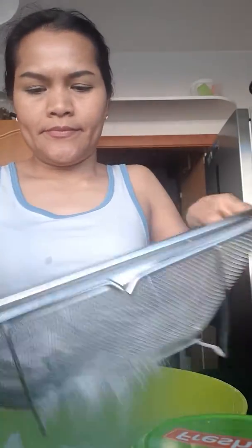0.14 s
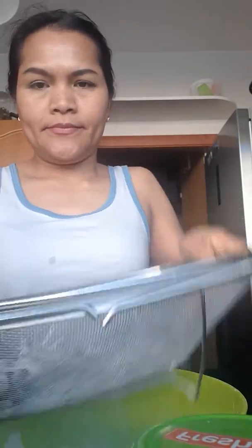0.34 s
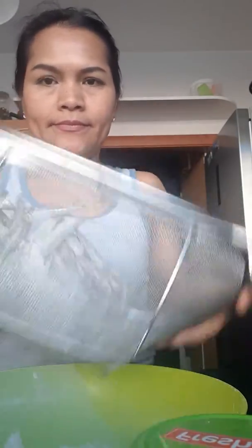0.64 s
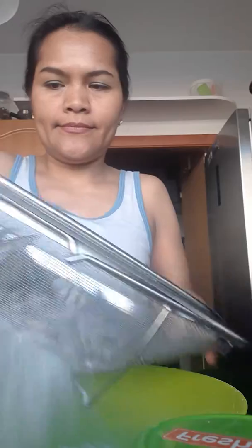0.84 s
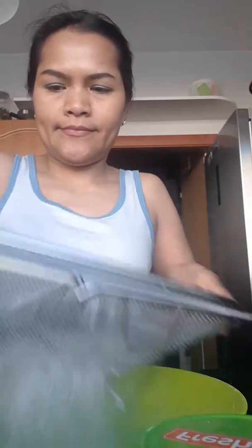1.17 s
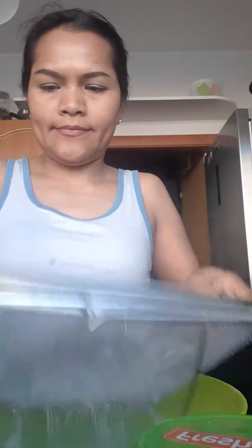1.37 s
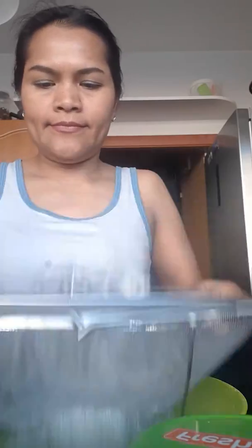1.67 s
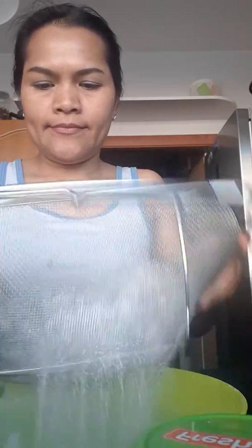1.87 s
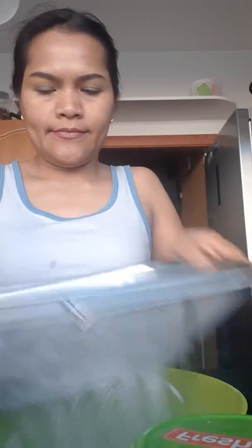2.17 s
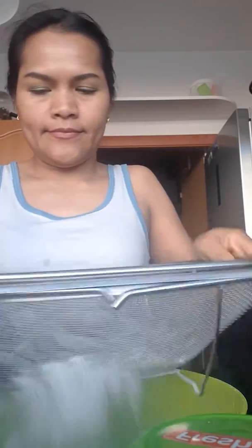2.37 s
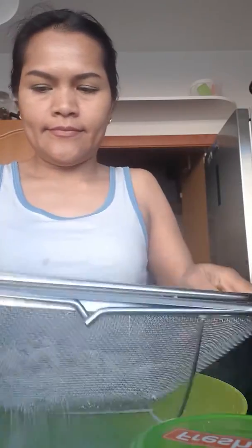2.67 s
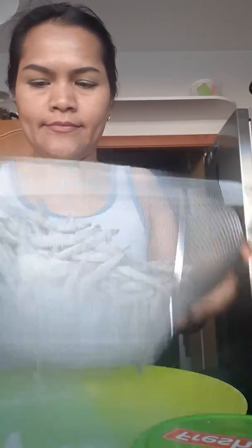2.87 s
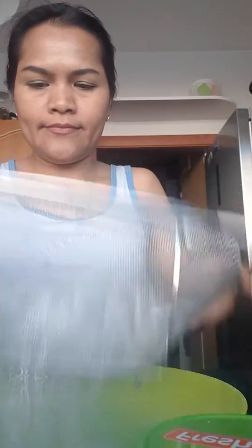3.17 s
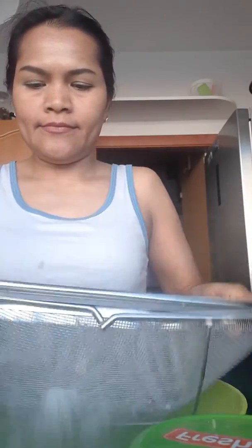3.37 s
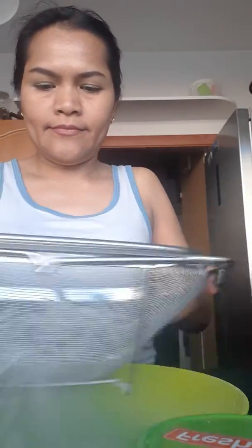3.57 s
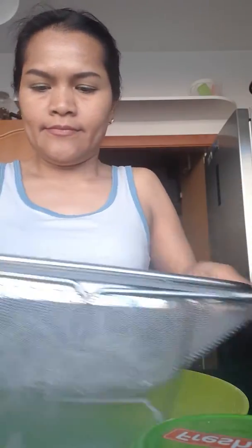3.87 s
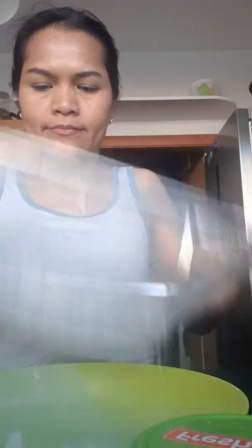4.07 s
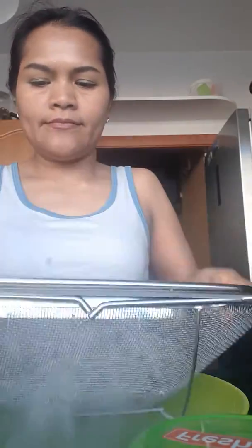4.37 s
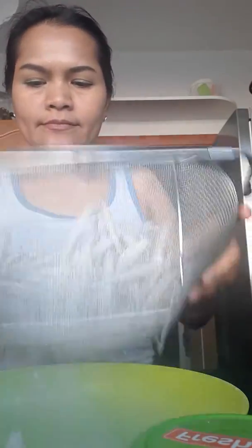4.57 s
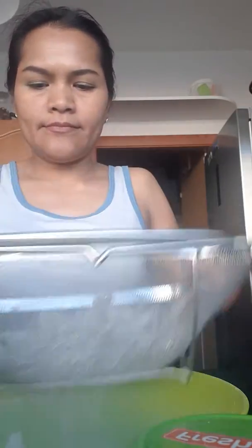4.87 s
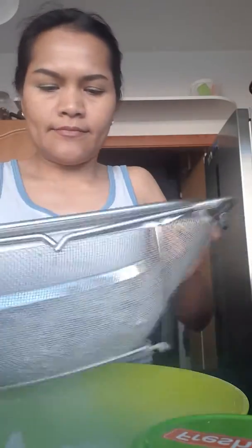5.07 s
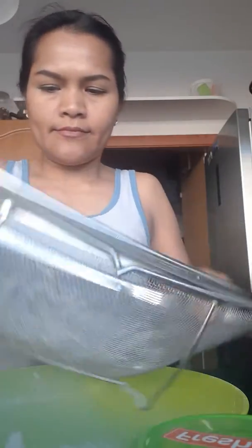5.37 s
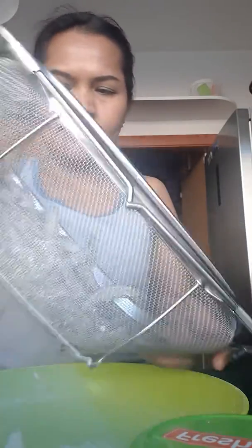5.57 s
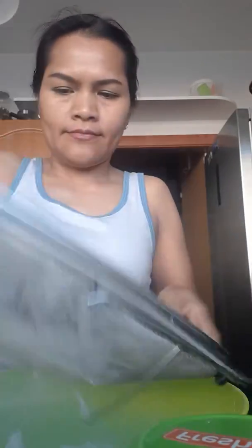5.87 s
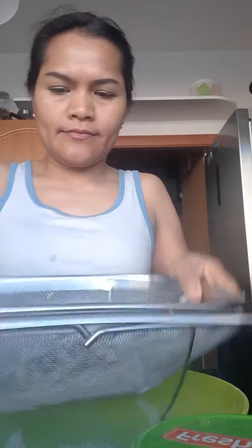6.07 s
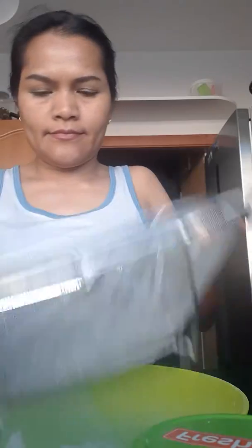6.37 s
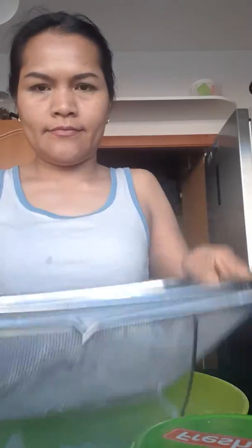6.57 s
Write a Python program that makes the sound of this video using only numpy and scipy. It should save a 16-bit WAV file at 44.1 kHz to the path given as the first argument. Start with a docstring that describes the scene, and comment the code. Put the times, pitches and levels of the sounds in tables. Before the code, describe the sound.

Close to the microphone in a kitchen, a wire strainer is shaken continuously, its load of floured fish skidding and dropping on the mesh with a raspy rustle and a fine hiss of flour. Light metal ticks grow into a run of sharp clicks midway, joined by a hollow knock on a plastic bowl, then thin out as the swishing continues. An appliance hums quietly behind.

```python
"""Tossing floured fish in a strainer

Small floured fish are tossed in a steel mesh strainer over a plastic bowl, close to a phone in a kitchen.
Each lurch sends the load skidding over the wires with a buzz; it drops back on the mesh and sheds flour.
The loose wire legs tick on the rim, and a leg knocks the bowl. An appliance drones behind.
The right microphone port faces the strainer; the phone's body shades the left."""
import sys
import numpy as np
from scipy import signal
from scipy.fft import rfft, irfft, next_fast_len
from scipy.io import wavfile
from scipy.ndimage import uniform_filter1d, map_coordinates

SR = 44100
rng = np.random.default_rng(int(sys.argv[2]) if len(sys.argv) > 2 else 0)


def unload_wav(signal):
    """Save mono or channel-first audio to the path in sys.argv[1] as 16-bit WAV at rate SR, clipped to [-1, 1]."""
    wavfile.write(
        sys.argv[1],
        SR,
        np.round(np.clip(np.atleast_2d(signal).T, -1, 1) * 32767).astype(np.int16),
    )


N = 296164

# skids of the load: (time [s], level [dB], crossing rate [Hz], fizz [dB], width [octaves], T60 [s])
SKIDS = [(0.0, -48, 2213, -7, 0.184, 0.4842), (0.04, -43, 3295, -6.5, 0.228, 0.3264),
         (0.073, -39, 3336, -8.5, 0.2697, 0.3107), (0.104, -43, 2165, -30, 0.273, 0.3232),
         (0.154, -41.5, 3450, -22.5, 0.261, 0.2988), (0.224, -40.5, 3966, -15.5, 0.33, 0.2663),
         (0.243, -43, 3060, -19.5, 0.2754, 0.3149), (0.374, -49, 2954, -32.5, 0.273, 0.2306),
         (0.439, -54, 3400, -6.5, 0.2913, 0.5), (0.5, -54, 2295, -1.5, 0.2343, 0.8385),
         (0.572, -47, 3200, -21, 0.262, 0.5895), (0.601, -33.5, 2072, -41, 0.2186, 0.3832),
         (0.62, -47, 2868, -31, 0.1388, 0.2796), (0.655, -46.5, 2988, -10, 0.3806, 0.5153),
         (0.672, -43.5, 3578, -7, 0.3056, 0.382), (0.773, -44.5, 3479, -5, 0.2558, 0.3223),
         (0.775, -46, 4755, -20, 0.1176, 0.1111), (0.886, -44, 2150, -37, 0.193, 0.6079),
         (0.953, -39.5, 3515, -12, 0.1715, 0.393), (1.083, -47.5, 2407, -4.5, 0.496, 0.5531),
         (1.331, -46.5, 4535, -3.5, 0.3903, 0.1557), (1.335, -54.5, 8497, -30, 0.0715, 0.0066),
         (1.357, -43.5, 3492, -25.5, 0.1977, 0.536), (1.383, -39, 2013, -33, 0.189, 0.3265),
         (1.443, -37, 2802, -17.5, 0.371, 0.3649), (1.484, -53.5, 8238, -12, 0.1054, 0.1572),
         (1.576, -54, 3719, -30, 0.2456, 0.5), (1.643, -45.5, 2446, -7.5, 0.2397, 0.5371),
         (1.673, -43, 2746, -18.5, 0.2765, 0.5012), (1.754, -42, 2112, -2.5, 0.2602, 0.2924),
         (1.824, -36.5, 3176, -9, 0.2135, 0.2363), (1.886, -46.5, 4995, -4, 0.262, 0.2029),
         (1.89, -57.5, 8284, -27.5, 0.072, .5), (1.922, -52, 8506, -30, 0.0613, 0.2913),
         (1.925, -42.5, 4383, -9, 0.278, 0.29), (1.98, -41, 3802, -4, 0.357, 0.4034),
         (2.03, -45.5, 2249, -16, 0.2875, 0.0591), (2.087, -46, 3178, -11, 0.1635, 0.6475),
         (2.184, -41, 2128, -28.5, 0.1888, 0.5177), (2.312, -42.5, 2262, -5.5, 0.2395, 0.6202),
         (2.366, -49.5, 3825, -11, 0.2424, 0.5634), (2.405, -44, 2721, -29, 0.3664, 0.37),
         (2.459, -49.5, 5239, -1, 0.2382, 0.5339), (2.601, -48, 3520, -12, 0.404, 0.3281),
         (2.644, -44, 3021, -21.5, 0.2718, 0.2717), (2.713, -44.5, 2806, -10.5, 0.4082, 0.3797),
         (2.894, -45.5, 4295, -12, 0.2832, 0.4824), (2.956, -38.5, 2406, -4.5, 0.5116, 0.4491),
         (3.013, -35.5, 2660, -32.5, 0.2483, 0.3125), (3.084, -46.5, 5529, -21.5, 0.235, 0.268),
         (3.139, -46, 3003, -34.5, 0.3484, 0.4152), (3.248, -47.5, 3016, -4, 0.295, 0.4427),
         (3.33, -43.5, 2159, -3, 0.2956, 0.6063), (3.419, -41, 2211, -4, 0.8, 0.6618),
         (3.554, -45, 2937, -6, 0.3853, 0.5), (3.645, -40, 4513, -25.5, 0.266, 0.2434),
         (3.77, -40, 2401, -25.5, 0.1857, 0.1065), (3.891, -45.5, 5268, -4.5, 0.1679, 0.6008),
         (3.936, -42.5, 3379, -31, 0.339, 0.41), (4.013, -42, 3756, -31, 0.193, 0.3543),
         (4.11, -46, 4704, -3.5, 0.3225, 0.3176), (4.181, -45.5, 4175, -2.5, 0.1702, 0.2784),
         (4.268, -37.5, 2123, -2.5, 0.1385, 0.2675), (4.305, -38.5, 2362, -28, 0.2687, 0.2294),
         (4.343, -37.5, 3384, -3, 0.2803, 0.3187), (4.446, -55.5, 3682, -1.5, 0.2406, 0.6747),
         (4.578, -48.5, 5324, -8, 0.3015, 0.5384), (4.617, -49, 2496, -27, 0.2446, 0.6126),
         (4.66, -43.5, 3734, -11.5, 0.2792, 0.5241), (4.734, -42, 3775, -10.5, 0.432, 0.2065),
         (4.742, -36.5, 2094, -20, 0.1586, 0.3449), (4.828, -52.5, 4085, -24, 0.295, 0.258),
         (4.889, -60, 7661, -12, 0.2467, 0.9262), (4.917, -49, 3822, -33, 0.284, 0.5),
         (5.011, -51, 3045, -18.5, 0.2308, 0.29), (5.116, -45, 3124, -9.5, 0.2702, .5),
         (5.189, -49.5, 2527, -2.5, 0.4493, 0.5), (5.299, -46, 3291, -19.5, 0.0876, 0.3535),
         (5.364, -34.5, 1912, -30, 0.3483, 0.3069), (5.495, -43, 2462, -4.5, 0.2675, .5),
         (5.55, -41.5, 4107, -14, 0.2956, 0.4288), (5.636, -43, 2396, -7, 0.2456, 0.7033),
         (5.712, -43, 2074, -12, 0.3893, .5), (5.834, -42.5, 2347, -39, 0.1944, 0.1926),
         (5.861, -41.5, 3054, -20.5, 0.4098, 0.488), (5.956, -39, 3056, -6.5, 0.238, 0.3039),
         (5.984, -38, 1968, -28.5, 0.2442, 0.0422), (6.087, -59, 7528, -4, 0.192, 0.8566),
         (6.208, -55, 5707, -27.5, 0.2467, 1), (6.295, -54.5, 3813, -4.5, 0.261, 0.7221),
         (6.371, -48, 2519, -29.5, 0.1823, 0.5836), (6.427, -38, 4350, -4, 0.2586, 0.1858),
         (6.473, -39.5, 2777, -31, 0.3576, 0.1511), (6.573, -48, 5168, -25, 0.3223, 0.3847),
         (6.618, -42.5, 3327, -36, 0.2433, 0.312), (6.691, -52, 2289, 0, 0.171, 2)]
# spectrum of the hiss on the mesh: (frequency [Hz], level [dB])
MESH_HISS = [(2500, -22.5), (4500, -2), (6500, -7), (8400, -7), (9300, -14.5), (12000, -18.5), (14000, -26),
             (15800, -33.5)]


def skids():
    """Periodic excitation: fish crossing evenly spaced wires buzz at speed / spacing, with fizz above."""
    low_edge = 0.9048  # the band is narrower below its pitch: no fish slides slowly
    out, t = np.zeros((2, N)), np.arange(SR // 2) / SR
    for s, db, hz, fizz_db, width, t60 in SKIDS:
        lag = rng.integers(-16, 17)
        offset = lambda f: np.abs(np.log2((f + 1) / hz)) / (width * np.where(f < hz, low_edge, 1))
        faster = amp(-10 + 0.17166 * fizz_db)  # a fizzy lurch has more fast fish
        shoulder = lambda f: faster / (1 + (0.659 * hz / (f + 1)) ** 9) / (1 + (f / 5500) ** 4)
        buzz = port_noise(lambda f: np.exp(-offset(f) ** 1.382) + shoulder(f), len(t), lag, 0.7223)
        fizz = amp(fizz_db) * rise(t, 0.0092) * port_noise(spectrum(MESH_HISS), len(t), lag, grain_db=1)
        landing = 1 + 1.872 * decay(t, 0.010616)  # the first fish hit hardest
        stroke = rise(t, 0.002635) * decay(t, t60)
        lumps = amp(wobble(50, len(t)) + 1.3 * wobble(170, len(t)))  # fish after fish
        add(out, s, amp(db) * stroke * lumps * (landing * buzz + fizz))
    return out


def leg_ticks():
    """Impact of steel on steel: a crack and damped modes, coloured by the blow's spot and sharpness."""
    # legs on the rim: (time [s], level [dB], centre [Hz], fall [dB/octave], cutoff [Hz], T60 [s])
    taps = [(0.226, -43, 4295, 6, 8005, 0.01422), (0.6075, -35, 2099, 14, 6000, 0.01858),
            (0.6236, -39, 7490, 9, 9480, 0.0118), (0.8313, -43.5, 2651, 7, 4007, 0.01745),
            (0.9552, -38, 3400, 9.5, 7010, 0.01892), (1.332, -43.5, 4726, 5, 9000, 0.01757),
            (1.4446, -44, 2997, 5, 8000, 0.01496), (1.6222, -42.5, 2485, 7, 5000, 0.01767),
            (1.6735, -33.5, 2534, 7, 6010, 0.02216), (1.7701, -40.5, 4500, 2.5, 12000, 0.01366),
            (1.9796, -40.5, 4206, 8.5, 9000, 0.01517), (2.713, -34, 2900, 6.5, 7010, 0.01719),
            (2.8313, -36, 2469, 5, 4802, 0.02294), (2.8763, -24, 2936, 9, 9060, 0.01814),
            (2.8874, -14.5, 7208, 9, 14450, 0.013656), (2.8887, -19, 7203, 6.5, 13800, 0.014546),
            (2.9667, -30.5, 2332, 4, 4503, 0.0184), (2.982, -32.5, 2503, 6.5, 5000, 0.01607),
            (2.9908, -27, 2446, 6, 8477, 0.01821), (3.0668, -49, 2770, 6, 8990, 0.0158),
            (3.11, -35, 3415, 8, 8960, 0.01562), (3.251, -41.5, 2520, 4, 9020, 0.03566),
            (3.26, -36, 2522, 5.5, 11990, 0.01849), (3.3289, -30.5, 2197, 8.5, 9955, 0.01848),
            (3.3532, -33, 2656, 5.5, 7990, 0.01611), (3.4121, -19, 1906, 7, 13550, 0.02258),
            (3.6304, -34.5, 3600, 15.5, 4500, 0.01767), (3.6364, -11.5, 7705, 5, 14160, 0.016363),
            (3.638, -19.5, 4434, 12.5, 5995, 0.02017), (3.6484, -23.5, 3009, 6, 6000, 0.01799),
            (3.7046, -33.5, 2267, 15, 8000, 0.0265), (3.734, -35, 3903, 9, 5968, 0.01827),
            (3.744, -30, 4712, 1.5, 8995, 0.02567), (3.761, -25, 2576, 2, 12940, 0.024105),
            (3.7641, -29, 2551, 20, 5025, 0.02487), (3.923, -26.5, 4536, 7.5, 9823, 0.01993),
            (4.1106, -40.5, 4531, 14.5, 7486, 0.01968), (4.1428, -37.5, 4723, 7.5, 6004, 0.02378),
            (4.2213, -37.5, 2462, 15, 7000, 0.02934), (4.2568, -32, 3917, 12.5, 9490, 0.02653),
            (4.2613, -24, 3882, 6.5, 11700, 0.021006), (4.2936, -28.5, 2201, 12, 8510, 0.0194),
            (4.376, -25, 2490, 19, 5011, 0.02643), (4.3976, -27, 3747, 3.5, 5984, 0.01512),
            (4.415, -37.5, 2218, 14.5, 4000, 0.01695), (4.5403, -34, 2495, 6, 8859, 0.015893),
            (4.652, -29, 3755, 8, 11490, 0.02199), (5.2797, -39, 2677, 3.5, 7027, 0.01765),
            (5.3669, -35, 2200, 6, 7004, 0.01855), (5.551, -36, 4303, 9.5, 7000, 0.0191),
            (5.7129, -37, 2569, 8, 5010, 0.01778), (5.7504, -38.5, 2270, 10, 5000, 0.01671),
            (6.4288, -38, 4296, 6.5, 9000, 0.01624), (6.6186, -40.5, 3310, 12, 7000, 0.01657)]
    # modes of rim and legs: (frequency [Hz], level [dB])
    rim_modes = [(2100, 0), (2520, 12), (2850, -1.5), (3300, 7), (4120, 8.5), (4640, 3), (5500, 0.5),
                 (6900, 2), (7500, 10.5), (8400, 3), (9100, 4), (10200, 6), (11800, 5), (13800, 1.5)]
    out, t = np.zeros((2, N)), np.arange(SR // 8) / SR
    for s, db, spot_hz, fall_db, top_hz, t60 in taps:
        left_db = 1.2483 + 3 * rng.standard_normal()
        tilt = lambda f: (-fall_db * np.abs(np.log2((f + 1) / spot_hz))
                          - 10 * np.log10(1 + (f / top_hz) ** 12))
        modes = [(hz, level, t60 * (spot_hz / hz) ** 0.5863) for hz, level in rim_modes]
        steel = ring(modes, tilt, t, spread_db=2.5, detune=0.012, path_s=0.0003)
        lag = rng.integers(-16, 17)
        crack = decay(t, t60) * port_noise(lambda f: amp(tilt(f)) * (f > 1900), len(t), lag, grain_db=4)
        contact = amp([[left_db], [0]]) * rise(t, 0.000643) * (amp(-13.5) * steel + amp(-2.5) * crack)
        add(out, s, amp(db + 2.5) * kitchen(contact, wet_db=-8.5))
    return out


def bowl_knocks():
    """Modal response: the bowl thuds and chatters on the worktop; harder blows reach its upper modes."""
    # knocks: (time [s], level [dB], hardness [dB], pitch of the spot [Hz], give of the wall [dB])
    blows = [(0.004, -29.5, -10.5, 323.1, 13), (0.049, -34.5, -11.5, 203.8, 16),
             (2.349, -24, -22.5, 274, 12), (2.363, -30, -12.5, 277.3, 11), (2.385, -35, -22, 236.6, 14),
             (2.409, -38.5, -9.5, 299.1, 12), (2.438, -38.5, -6, 151.9, 15), (2.97, -43, -24.5, 319.4, 12),
             (3.009, -55.5, 6.5, 627.5, 14.5), (3.330, -31.5, -1, 240.6, 7.5),
             (3.336, -28, -9, 297.9, 11.5), (3.348, -27.5, -8.5, 249, 12.5), (3.380, -25, -6, 264.9, 9.5),
             (3.387, -25.5, -8, 270.2, 10), (3.4115, -18.5, 4.5, 260.6, 2.5),
             (3.4166, -20.5, -5, 328.8, 15.5), (3.430, -23, -12, 254.9, 10),
             (3.447, -29.5, -10.5, 260.5, 16), (3.466, -31, -11.5, 267.5, 12), (3.487, -37, -6, 271, 12.5),
             (3.515, -42, -8, 328, 9.5)]
    # modes of the plastic bowl: (frequency [Hz], level [dB], T60 [s])
    bowl_modes = [(126.25, -15.5, 0.2085), (180.23, -11, 0.033), (256.05, -3, 0.1739),
                  (311.88, -7.5, 0.1338), (428.67, -6, 0.132), (578.06, -6, 0.0944), (653.83, -5, 0.12197),
                  (787.97, -9, 0.0917), (911.45, -6, 0.04275), (1121.6, -13.5, 0.106),
                  (1572.4, -3.5, 0.03578), (1649.2, -4, 0.0375), (1903.1, -12, .05)]
    out, t = np.zeros((2, N)), np.arange(SR // 3) / SR
    for s, db, hard_db, spot_hz, give_db in blows:
        tilt = lambda f: (hard_db + 5) * np.clip(np.log2((f + 1) / 300), 0, 1)
        plastic = ring(bowl_modes, tilt, t, spread_db=1.5, detune=0.006, path_s=0.00005)
        band = lambda f: amp(tilt(f)) * (f > 150) / (1 + (f / 850) ** 5)
        chatter = amp(hard_db / 2 - 0.28) * decay(t, 0.1685) * port_noise(band, len(t))
        dent = amp(give_db) * rise(t, 0.002897) * decay(t, 0.027717) * np.sin(2 * np.pi * spot_hz * t)
        thud = rise(t, 0.0010853) * (plastic + chatter + dent)
        add(out, s, amp(db - 9) * kitchen(thud, wet_db=-12))
    return out * amp([[2.5], [0]])


def basket_drumming():
    """Damped vibration: the load drops back on the mesh basket, whose sound swells and dies away."""
    # landings of the load: (time [s], level [dB])
    landings = [(0.073, -44.5), (0.5, -55), (0.598, -43.5), (0.774, -56), (0.888, -57.5), (0.953, -53),
                (1.357, -55.5), (1.383, -46), (1.451, -60), (1.673, -52), (1.754, -51.5), (1.981, -58),
                (2.03, -56), (2.088, -54.5), (2.184, -47.5), (2.365, -45.5), (2.405, -52.5), (2.5, -54),
                (2.644, -60), (2.892, -54), (2.957, -44.5), (3.0, -55.5), (3.33, -41.5), (3.645, -47.5),
                (4.268, -44.5), (4.293, -48), (4.344, -44.5), (4.738, -46.5), (5.364, -43.5),
                (5.712, -54.5), (5.958, -57), (5.984, -45), (6.429, -52.5)]
    # spectrum of the basket: (frequency [Hz], level [dB])
    basket = [(240, -33.5), (400, -8), (561, -10), (900, -15), (1230, -12.5), (1700, -7.5), (2210, -13.5),
              (3740, -120)]
    out, t = np.zeros((2, N)), np.arange(SR // 2) / SR
    swell = rise(t, 0.012138) * decay(t, 0.33004)
    for s, db in landings:
        level = amp(db + 1.1486 * wobble(43.13, len(t)))
        add(out, s, level * swell * port_noise(spectrum(basket), len(t)))
    return out


def sifting():
    """Friction noise: between lurches the load keeps shifting, fish slip and flour rains through."""
    # showers of flour shaken out by the tosses: (time of thickest fall [s], level [dB])
    showers = [(0.1, -80.5), (0.65, -81.5), (0.85, -76.5), (1.08, -65.5), (1.4, -98), (1.68, -65),
               (1.98, -79), (2.36, -64), (3.02, -69), (3.33, -72), (3.56, -73.5), (4.02, -61.5), (4.4, -69),
               (4.75, -66.5), (5.16, -65), (5.5, -81.5), (5.76, -70), (6.0, -73), (6.72, -109)]
    # spectra of the shifting load and the falling flour: (frequency [Hz], level [dB])
    rustle_band = [(500, -49.5), (800, -19.5), (1400, -16), (2300, 1), (3500, -0.5), (4600, -8),
                   (6000, -11.5), (8000, -31.5)]
    flour_band = [(8000, -25), (10000, 3), (12500, -16), (14500, -5), (15800, -16.5)]
    half_width_s = 0.06473
    t, stir = np.arange(N) / SR, stirring()
    fall = sum(amp(db) * np.exp(-((t - s) / half_width_s) ** 2) for s, db in showers)
    rustle = patchy(port_noise(spectrum(rustle_band), N, lag=4.6, grain_db=-2.5), depth_db=3)
    hiss = patchy(port_noise(spectrum(MESH_HISS), N, lag=5, grain_db=0.5), depth_db=3)
    flour = port_noise(spectrum(flour_band), N, lag=11, grain_db=-3.5)
    # each noise has a resting level and grows with the motion
    rustle *= amp(-66.5) + amp(-12) * stir
    hiss *= amp(-64.5) + amp(-31.5) * stir + amp(4) * fall
    flour *= amp(-81.5) + fall
    return rustle + hiss + flour + stir * (amp(-19.5) * slips() + amp(-25) * grit())


def stirring():
    """Incoherent sources add in power: the load's motion is the root of the skids' summed powers."""
    kicks, t = np.zeros(N), np.arange(SR) / SR
    for s, db, *_ in SKIDS:
        kicks[round(s * SR)] += amp(db) ** 2
    settling = (rise(t, 0.01587) * decay(t, 0.51524)) ** 2
    return np.sqrt(np.abs(signal.fftconvolve(kicks, settling)[:N]))


def slips(count=110):
    """Wire-crossing tones: single fish zip over a few wires in short, narrow buzzes at random times."""
    out, t = np.zeros((2, N)), np.arange(SR // 10) / SR
    for when, pitch, size, life in rng.random((count, 4)):
        hz = 4300 * 2.2 ** pitch
        band = lambda f: np.exp(-(np.log2((f + 1) / hz) / 0.05793) ** 2)
        buzz = port_noise(band, len(t), lag=rng.integers(-16, 17))
        add(out, when * N / SR, amp(13 * size) * rise(t, 0.0033) * decay(t, 0.08 + 0.1 * life) * buzz)
    return unit(out)


def grit(count=900):
    """Shot noise: fins and crumbs flick single wires in tiny clicks, a few of them much louder."""
    when, size = rng.random((count, 2)).T
    flicks = np.bincount((when * N).astype(int), (1.001 - size) ** -0.45, N)
    bursts = signal.fftconvolve(flicks, decay(np.arange(400) / SR, 0.005345))[:N]
    return unit(bursts * port_noise(spectrum(MESH_HISS), N, lag=4))


def appliance_drone():
    """Line spectrum over a continuum: a motor's tones waver in level and phase above its rumble."""
    # motor tones and rumble spectrum: (frequency [Hz], level [dB])
    motor_lines = [(102.3, -68), (134.6, -66), (199.2, -63.5), (269.2, -66), (393.0, -68.5)]
    rumble_band = [(15, -47.5), (25, 5), (38, 1), (50, 5), (64, -6), (82, -6), (102, -3), (202, -3),
                   (305, -3.5), (368, -2), (437, -13), (528, -10.5), (718, -22), (961, -24.5), (1500, -25),
                   (1950, -56.5), (3300, -120)]
    t, tones = np.arange(N) / SR, np.zeros(N)
    for hz, db in motor_lines:
        tones += amp(db + 3.7686 * wobble(9, N)) * np.sin(2 * np.pi * hz * t + 1.1 * wobble(22, N))
    return tones + amp(-56.5 + 1.1917 * wobble(6.1, N)) * port_noise(spectrum(rumble_band), N)


def kitchen(x, wet_db):
    """Reverberation: the direct sound, then a diffuse tail in which each frequency has its own decay."""
    # reverberation time of the room: (frequency [Hz], T60 [s])
    room_t60 = [(200, 0.5168), (1000, 0.2818), (3000, 0.4268), (6000, 0.3923), (14000, 0.2768)]
    hz, t, z = signal.stft(port_noise(np.ones_like, SR // 3), SR, nperseg=256)
    tail = signal.istft(z * decay(t, along(room_t60, hz)[:, None]), SR, nperseg=256)[1]
    response = np.pad(amp(wet_db) * tail / np.linalg.norm(tail[1]), ((0, 0), (200, 0)))
    response[:, 0] = 1  # direct path
    return signal.fftconvolve(x, response, axes=1)


def ring(modes, tilt, t, spread_db, detune, path_s):
    """Modal superposition: one blow rings damped sines at both ports, coloured by tilt(Hz) in dB."""
    hz, db, t60 = np.transpose(modes)[:, :, None]
    level = db + tilt(hz) + spread_db * rng.standard_normal(hz.shape)
    hz = hz * (1 + detune * rng.standard_normal(hz.shape))  # grip and load shift the modes
    late = np.array([rng.uniform(-1.1509, 1) * path_s, 0])[:, None, None]  # unequal paths to the ports
    return np.sum(amp(level) * decay(t, t60) * np.sin(2 * np.pi * hz * (t - late)), axis=1)


def port_noise(gain, size, lag=0, grain_db=0):
    """Partly coherent noise at two ports, the left late by lag samples; grain_db makes it gritty."""
    # likeness of the two ports: (frequency [Hz], coherence [0-1])
    coherence = [(60, 0.8109), (300, 1), (700, 0.4345), (1500, 0.03864), (4000, 0.6027), (12000, 0.427)]
    hz = np.fft.rfftfreq(size, 1 / SR)
    grain = amp(grain_db * wobble(500, size) if grain_db else 0)
    right, separate = rfft(rng.standard_normal((2, size)) * grain)
    share = np.clip(along(coherence, hz), 0, 1)
    left = share * right * np.exp(-2j * np.pi * hz * lag / SR) + np.sqrt(1 - share ** 2) * separate
    return unit(irfft(np.array([left, right]) * gain(hz), size))


def patchy(x, depth_db):
    """Random amplitude modulation in small patches of time and frequency."""
    z = signal.stft(x, nperseg=256)[2]
    field = uniform_filter1d(rng.standard_normal(z.shape[1:]), size=5, axis=0)
    field = uniform_filter1d(field, size=9, axis=1)
    return unit(signal.istft(z * amp(depth_db * unit(field)), nperseg=256)[1][:, :N])


def amp(db):
    """Decibels to amplitude ratio."""
    return 10 ** (np.asarray(db) / 20)


def rise(t, tau_s):
    """First-order onset with time constant tau_s."""
    return 1 - np.exp(-t / tau_s)


def decay(t, t60):
    """Exponential damping by 60 dB in t60 seconds."""
    return amp(-60 * t / t60)


def unit(x):
    """Normalisation to rms 1."""
    return x / np.sqrt(np.mean(x ** 2) + 1e-20)


def along(points, hz):
    """Interpolation of (frequency [Hz], value) points on a log axis."""
    f, v = np.transpose(points)
    return np.interp(np.log(hz + 1), np.log(f + 1), v)


def spectrum(points):
    """Spectral envelope: a gain function through (frequency [Hz], level [dB]) points."""
    return lambda hz: amp(along(points, hz))


def wobble(rate, size):
    """Smooth random fluctuation, rate knots a second."""
    return map_coordinates(rng.standard_normal(int(size * rate / SR) + 4), [np.arange(size) * rate / SR])


def add(track, s, sound):
    """Superposition of a stereo sound on the track at time s."""
    i = round(s * SR)
    track[:, i:i + sound.shape[1]] += sound[:, :N - i]


def scene():
    """Linear superposition: the pressures of all sources add at each port."""
    return leg_ticks() + bowl_knocks() + skids() + basket_drumming() + sifting() + appliance_drone()


def record(dry):
    """Acoustic shadow and band limit: the phone's body shades the left port; the top treble is cut."""
    # the microphone's bass cut and notch, and the left port's shading: (frequency [Hz], gain [dB])
    mic_response = [(30, -25), (90, 0), (4950, 0), (5400, -8), (5850, 0)]
    left_shadow = [(60, -7), (110, -1), (200, -4.5), (380, -5), (700, -4), (1290, -5.5), (2380, -11.5),
                   (4400, -7.5), (8120, -11), (15000, -4)]
    top_hz, edge_hz = 16000, 700
    size = next_fast_len(N + 2048)
    hz = np.fft.rfftfreq(size, 1 / SR)
    ports = amp(along(mic_response, hz) + 1.5) * amp([along(left_shadow, hz), 0 * hz])
    band_limit = np.clip((top_hz - hz) / edge_hz, 0, 1) ** 2
    return irfft(rfft(dry, size) * ports * band_limit, size)[:, :N]


dry = scene()
out = record(dry)
unload_wav(out)
```